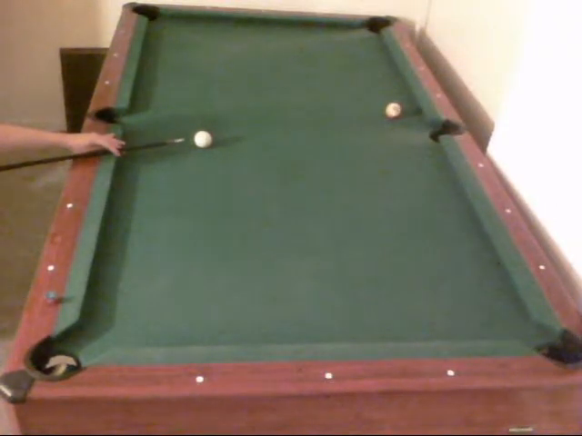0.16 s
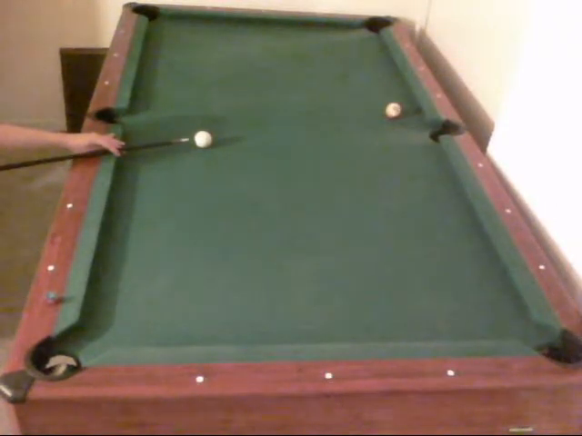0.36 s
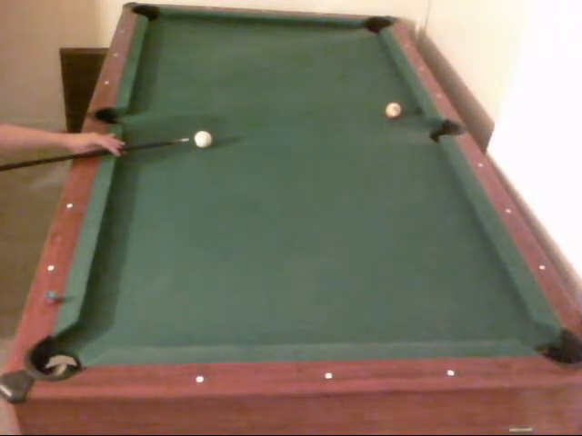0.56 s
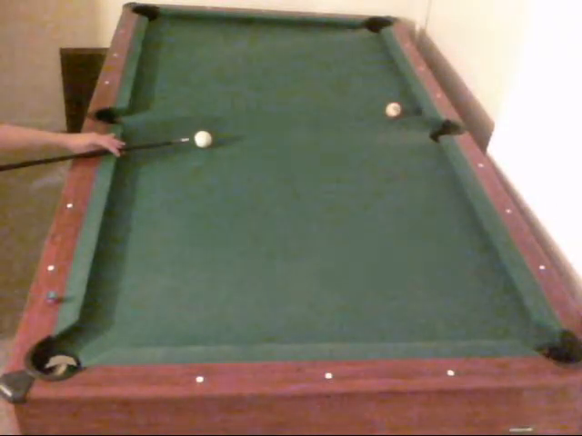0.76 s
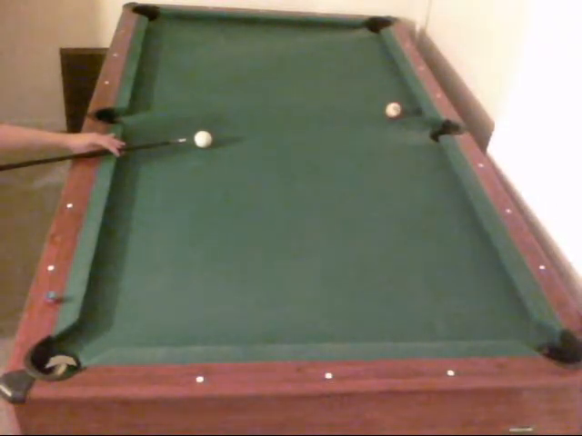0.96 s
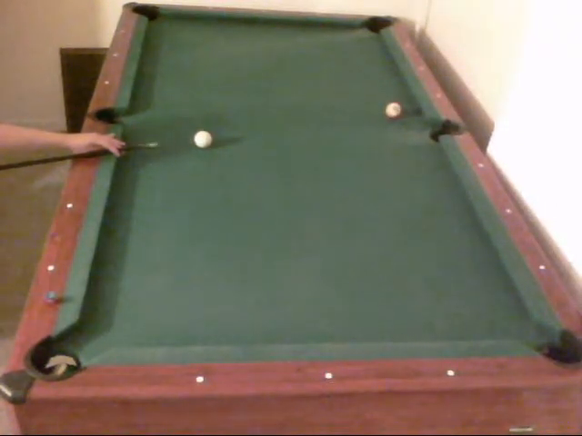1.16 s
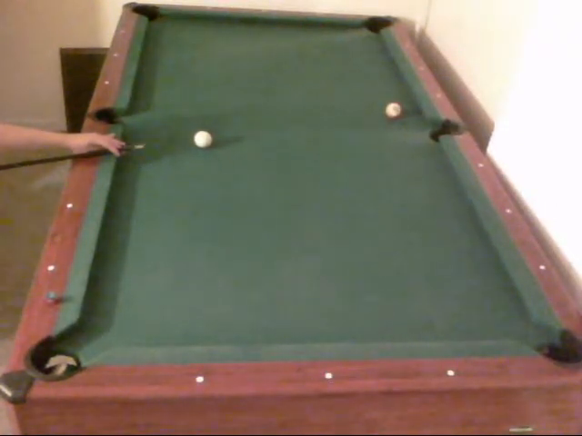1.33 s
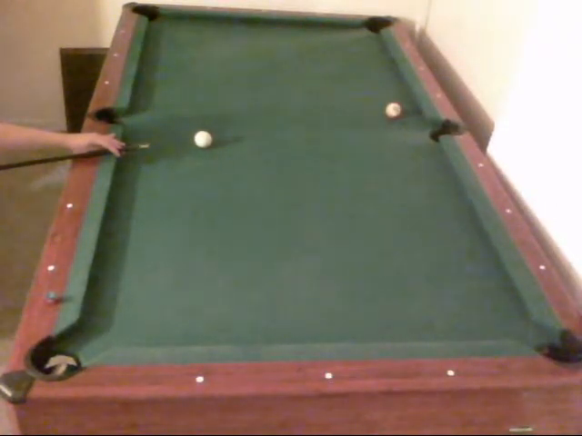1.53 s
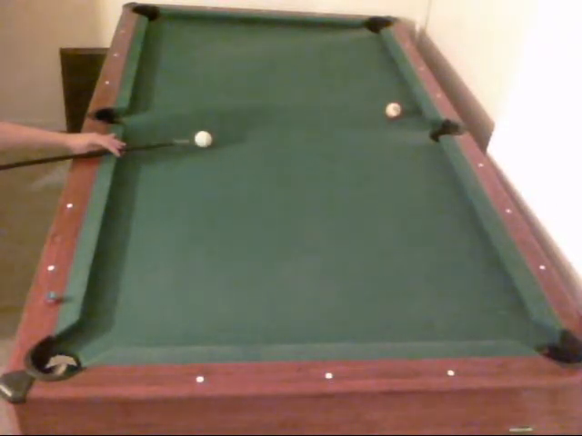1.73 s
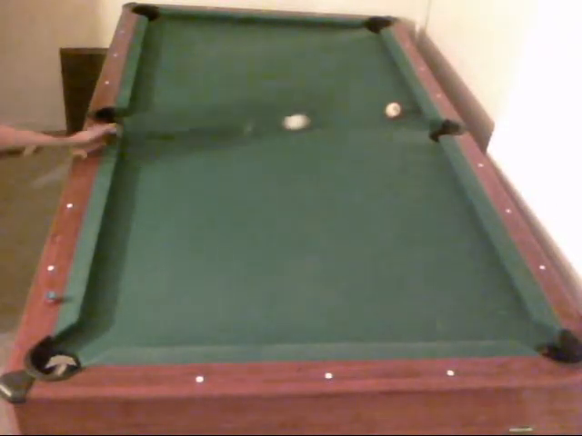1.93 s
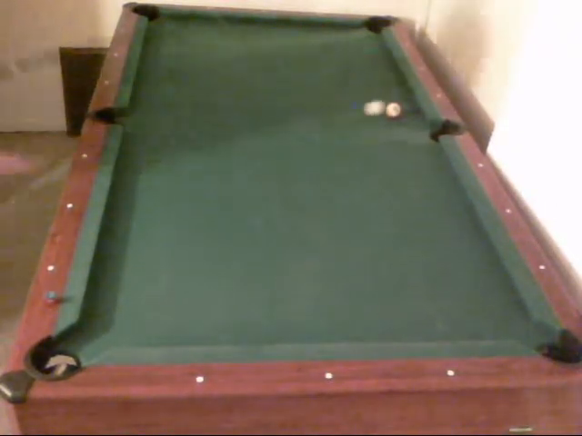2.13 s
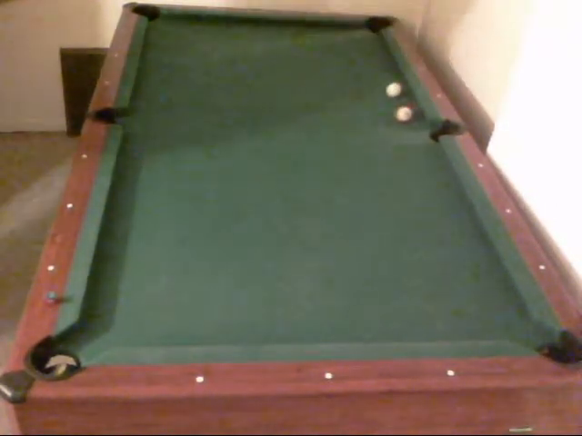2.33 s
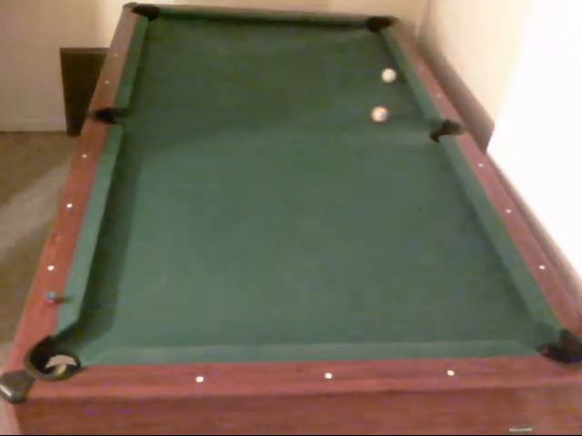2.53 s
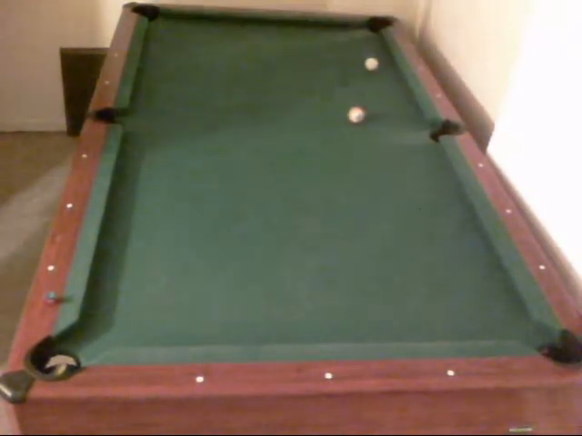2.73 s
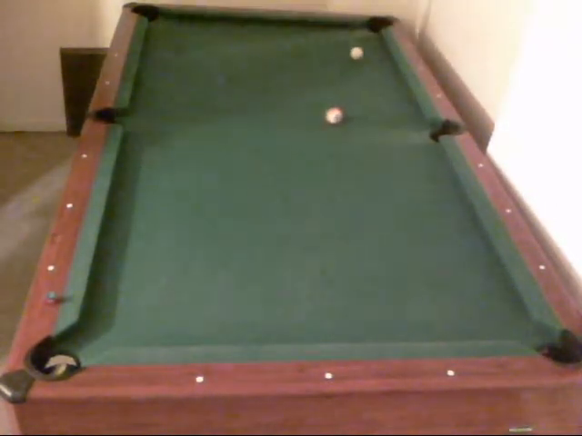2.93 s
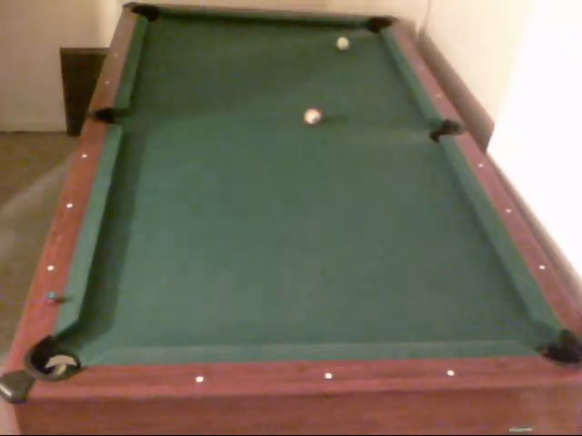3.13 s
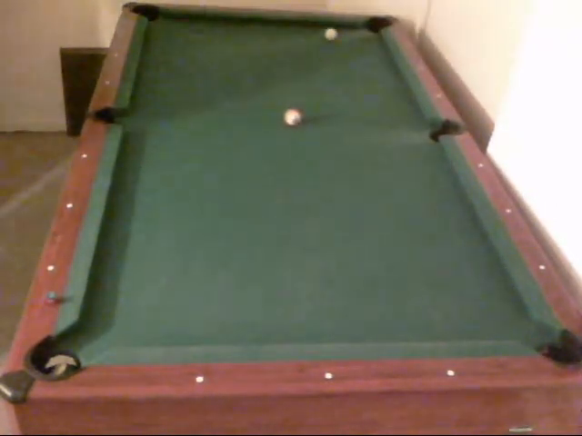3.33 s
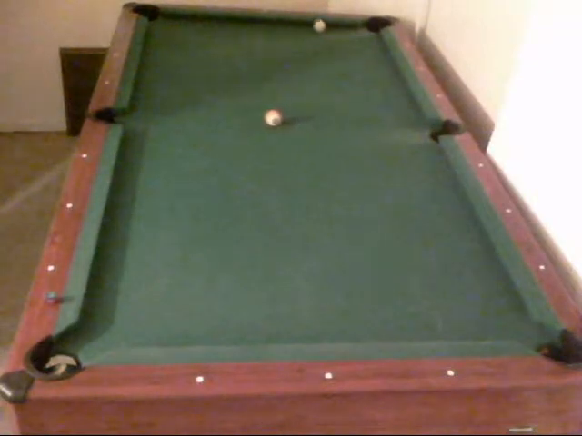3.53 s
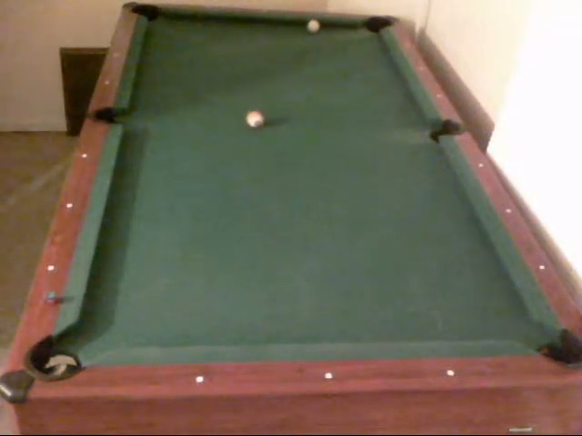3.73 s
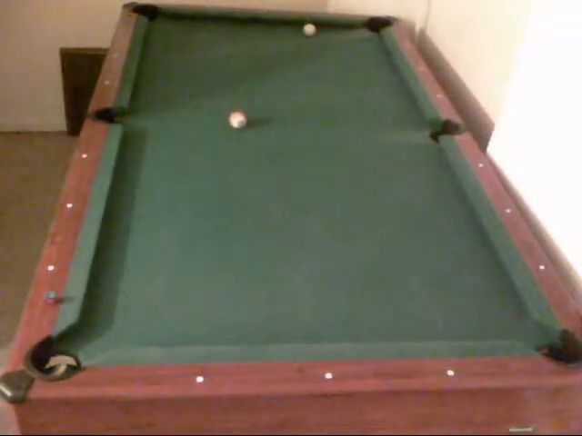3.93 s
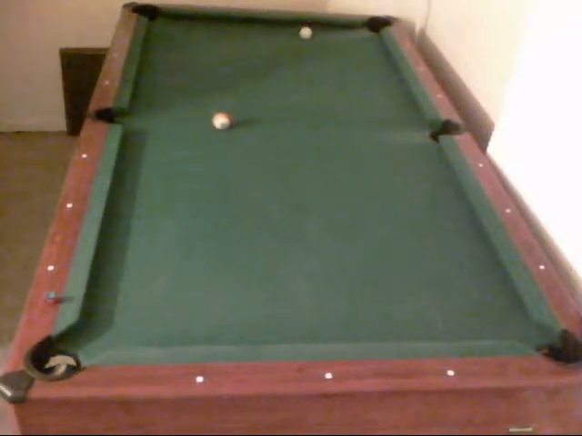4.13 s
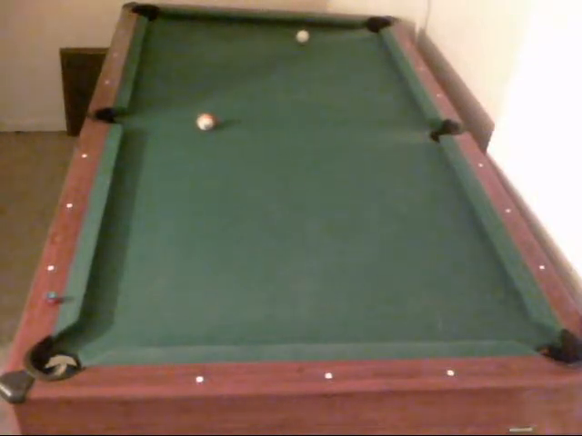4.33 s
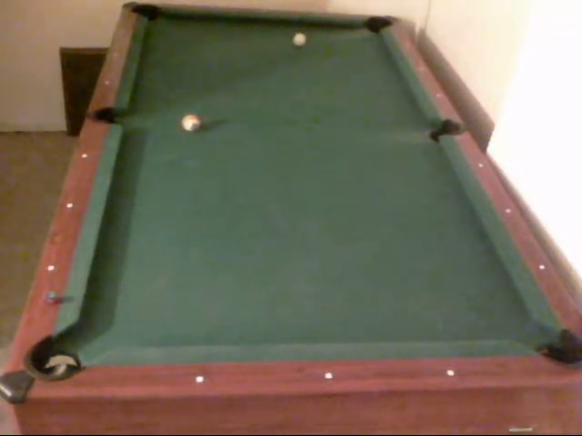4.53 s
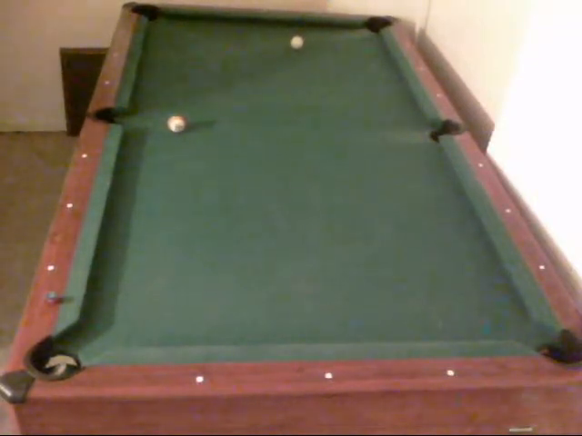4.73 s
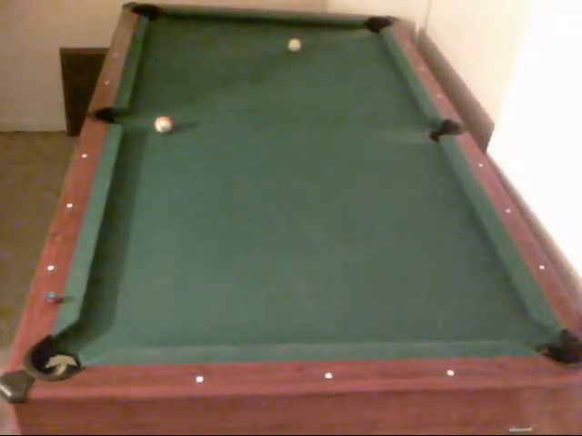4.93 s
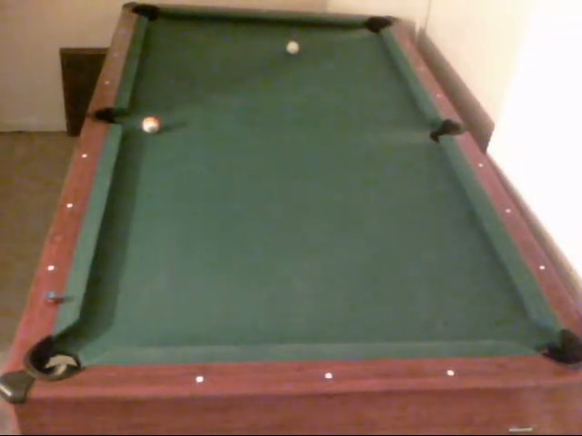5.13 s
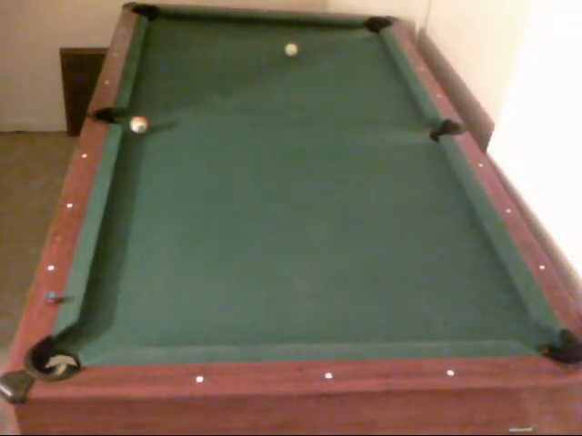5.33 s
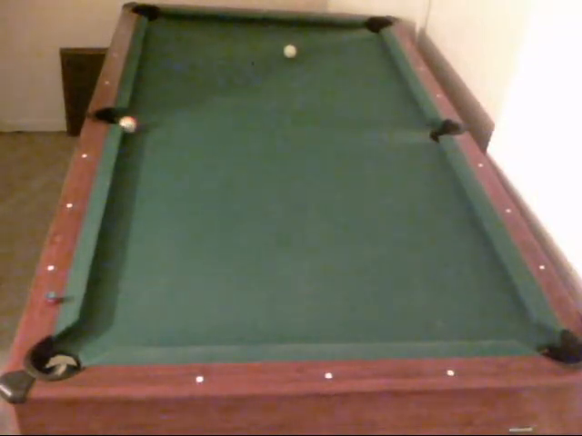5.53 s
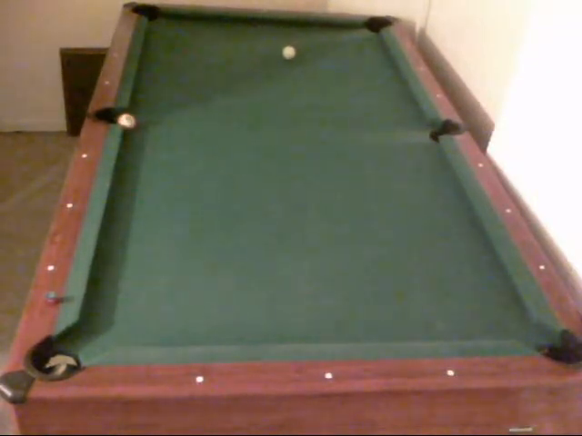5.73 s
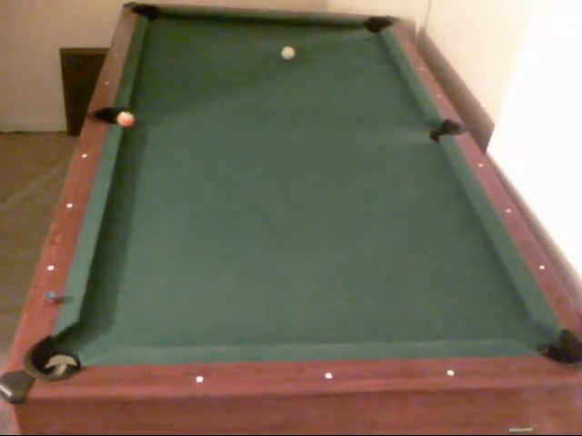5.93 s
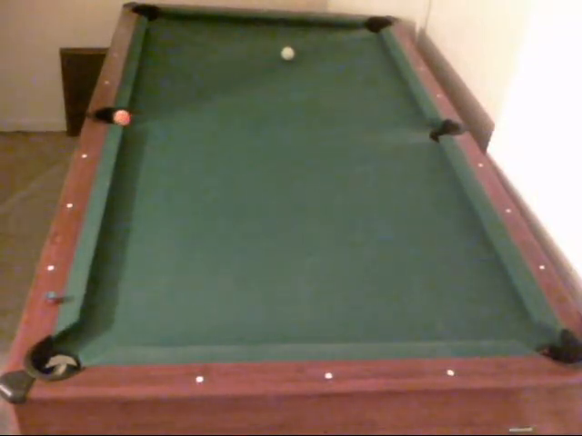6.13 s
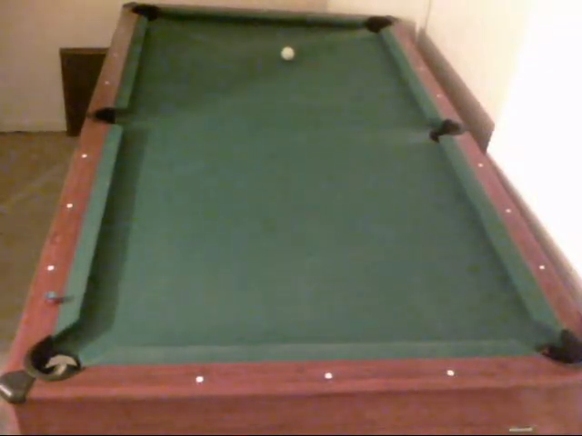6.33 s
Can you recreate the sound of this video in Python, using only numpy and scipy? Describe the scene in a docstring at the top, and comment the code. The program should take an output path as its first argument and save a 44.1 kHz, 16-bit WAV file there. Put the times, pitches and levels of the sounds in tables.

```python
"""Impacts on a pool table

In a small bare room the cue drives the white into a ball; both knock cushions and roll on, and one
drops onto balls in a pocket. Each blow radiates through the air, followed by wall echoes and a short
tail, and excites the low modes of the table bed, which rolling also shakes. Cue and sleeve slide softly.
A machine hums behind the hiss of a cheap microphone at the near rail."""
import sys
import numpy as np
from scipy import signal
from scipy.fft import rfft, irfft
from scipy.io import wavfile
from scipy.ndimage import uniform_filter1d

SR = 44100
rng = np.random.default_rng(int(sys.argv[2]) if len(sys.argv) > 2 else 0)


def pcm_store(signal):
    """Save signal as 16-bit PCM."""
    levels = np.round(np.clip(np.atleast_2d(signal), -1, 1) * 32767)
    wavfile.write(sys.argv[1], SR, levels.astype(np.int16).T)


N = 284886
T = np.arange(N) / SR
BLOW_SAMPLES = 22050

# impacts: t/s, air level/dB, bed level/dB
CUE_HITS = [(1.9085, -11, -15.5)]
BALL_HITS = [(2.296, -5.5, -19)]
CUSHION_HITS = [(2.379, -22.5, -23.5), (2.424, -31.5, -22.5), (2.480, -49, -34.5), (2.595, -42, -36.5),
                (3.757, -41.5, -34), (3.845, -62, -54)]
POCKET_HITS = [(6.411, -17.5, -37), (6.417, -20.5, -35), (6.438, -15, -35), (6.4415, -19.5, -30)]
TICK_HITS = [(2.953, -48, -57)]
# spectra of the impacts, the sliding and the noise floor: f/Hz, relative density/dB
CUE_SPECTRUM = [(88, -32), (150, 2), (283, -4.5), (474, -9), (906, -10.5), (975, -10), (1050, -10.5),
                (1710, -13.5), (1950, -23), (2160, -13), (2940, -17), (5080, -20.5), (6600, -55.5),
                (11200, -120)]
BALL_SPECTRUM = [(150, -47.5), (250, -24.5), (660, -23.5), (1460, -2.5), (1590, -4.5), (1720, 0),
                 (1950, -4), (2100, -1.5), (2640, -2.5), (3350, -4), (4370, -15.5), (5080, -26.5),
                 (6600, -67), (11200, -120)]
CUSHION_SPECTRUM = [(120, -1), (200, -10), (300, -4.5), (450, -4), (700, -6), (1000, -23), (2000, -30),
                    (5000, -46)]
POCKET_SPECTRUM = [(150, -53), (250, -23), (748, -11), (849, -11), (904, -11.5), (1520, -9), (1630, -8),
                   (2080, -5), (3950, -14), (5080, -31), (6600, -68), (11200, -120)]
TICK_SPECTRUM = [(300, -16), (1000, -1), (2500, -1), (4000, -1.5), (5000, -7)]
SLIDE_SPECTRUM = [(1500, -24), (2500, -10), (3200, -4), (4000, -2), (5500, 0)]
FLOOR_SPECTRUM = [(12, -2.5), (18, -3), (30, -8), (60, -9), (90, -14.5), (170, -17), (200, -24.5),
                  (400, -25.5), (700, -32.5), (2000, -36.5), (5500, -42)]
# modes of the cue shaft and the table bed: f/Hz, level/dB, T60/s
SHAFT_MODES = [(436, -15.5, 0.17), (960, -8, 0.047), (1292, -8, 0.19), (2200, -20, .12), (2520, -8, 0.18)]
BED_MODES = [(61, 4.5, 0.16), (75.2, 6.5, 0.28), (99.5, 0, 0.77), (133, -5.5, 0.26), (162.3, -6, 0.35),
             (189.9, -9, 0.53), (292, -17, 0.062)]
# thumps passed by rubber to the wooden rail, and hard contact clicks: t/s, f/Hz, level/dB, rise/cycles
RAIL_THUMPS = [(2.380, 119.6, -8.5, 0.84), (2.417, 88.3, -15.5, 0.93), (2.478, 79, -23, 1),
               (3.772, 78, -13.5, 1), (3.845, 68, -20.5, 1), (6.426, 112.1, -16, 0.84), (6.444, 62, -14, 1)]
CONTACT_CLICKS = [(1.9076, 3500, -17, .8), (2.378, 4750, -16, 2.1), (6.4172, 2100, -4.5, 0.77),
                  (6.4442, 2300, -15, 0.89), (6.4476, 2300, -2, 0.64), (6.4555, 2800, -16, 0.73)]
# bed vibration under rolling balls: t/s, level/dB
ROLL_LEVEL = [(1.95, -19), (2.01, -25), (2.11, -16), (2.24, -28), (2.28, -23), (2.36, -31), (2.53, -37),
              (2.61, -20.5), (2.72, -38.5), (3.01, -25), (3.2, -32), (3.44, -25.5), (3.49, -43),
              (3.54, -33), (3.62, -25.5), (3.67, -36.5), (3.95, -41.5), (4.22, -35), (4.4, -48.5)]
# its pitch as the balls cross the bed: t/s, f/Hz
ROLL_PITCH = [(2.0, 63.53), (2.7, 65.33), (2.82, 80), (2.98, 78.8), (3.07, 69.1), (3.6, 70.5),
              (4.25, 62.34)]
# slides of cue and sleeve: t/s at full level, hold/s, level/dB
SLIDES = [(0.33, .02, -47.5), (1.22, .02, -46), (2.74, .02, -53.5), (3.33, .17, -41)]
# direct sound and early reflections: delay/ms, level/dB
ARRIVALS = [(0, 2.5), (2, 0), (6.5, 1), (11.5, -3), (15.5, -3.5), (18, -4.5), (22.5, -7.5), (28, -13),
            (37, -6.5)]
# reverberation time: f/Hz, T60/s
ROOM_DECAY = [(150, 0.69), (500, 0.47), (1000, 0.46), (2000, 0.43), (4000, 0.38), (5500, 0.72)]
# rough machine resonances: f/Hz, bandwidth/Hz, level/dB
MACHINE_BANDS = [(42.7, 16, -41.5), (224.7, 7.7, -65.5), (278.7, 14, -61.5)]
# steady motor tones: f/Hz, level/dB
MOTOR_TONES = [(120, -46), (162, -50.5)]


def ball_impacts():
    """Elastic collision: ball meets ball, pocketed balls or cushion; softer contact starts more gently."""
    collision = impacts(BALL_HITS, BALL_SPECTRUM)
    pocket = impacts(POCKET_HITS, POCKET_SPECTRUM, contact_ms=.37)
    cushions = impacts(CUSHION_HITS, CUSHION_SPECTRUM, contact_ms=2.7)
    faint_tick = impacts(TICK_HITS, TICK_SPECTRUM)
    return collision + pocket + cushions + faint_tick


def cue_strike():
    """Impulse excitation: the tip strikes the white and sets the shaft ringing."""
    shaft = modal_ring(SHAFT_MODES, rise_s=.0046)
    return impacts(CUE_HITS, CUE_SPECTRUM, own_ring=shaft, contact_ms=2.1)


def impacts(hits, spectrum, own_ring=0, contact_ms=.1):
    """Two transmission paths: each blow sounds through the air and through the bed."""
    out = np.zeros(N)
    onset = 1 - np.exp(-np.arange(BLOW_SAMPLES) / SR * 1000 / contact_ms)
    for start_s, air_db, bed_db in hits:
        i = int(start_s * SR)
        air = undb(air_db) * onset * (room_response(spectrum) + own_ring)
        bed = undb(bed_db) * modal_ring(BED_MODES, rise_s=.011)
        out[i:i + BLOW_SAMPLES] += (air + bed)[:N - i]
    return out


def modal_ring(modes, rise_s):
    """Modal superposition: damped sinusoids, a little different for each spot struck."""
    t = np.arange(BLOW_SAMPLES) / SR
    hz, db, t60 = np.array(modes).T[:, :, None]
    spot = rng.standard_normal((2, len(modes), 1))
    partials = undb(db + 1.1 * spot[0]) * np.sin(2 * np.pi * hz * (1 + .0081 * spot[1]) * t)
    decay = np.exp(-np.log(1000) * t / t60)
    return (partials * decay).sum(axis=0) * (1 - np.exp(-t / rise_s))


def contact_pulses(pulses):
    """Heavy damping: a thump or click swells and dies within a few cycles."""
    start_s, hz, db, rise = np.array(pulses).T[:, :, None]
    cycles = np.clip((T - start_s) * hz, 0, 60)
    envelope = undb(db) * cycles / rise * np.exp(1 - cycles / rise)
    return (envelope * np.sin(2 * np.pi * cycles)).sum(axis=0)


def rolling():
    """Forced vibration: the bed hums at a wavering pitch; cloth grit stirs its upper modes."""
    pitch = np.interp(T, *np.transpose(ROLL_PITCH)) * (1 + .03 * drift(25))
    hum = np.sqrt(2) * np.sin(2 * np.pi * np.cumsum(pitch) / SR) * undb(2.5 * drift(14))
    grit = noise([(40, -4), (70, -1.5), (110, 2), (170, -7.5), (300, -27), (600, -41), (5000, -73.5)], N)
    envelope = undb(np.interp(T, *np.transpose(ROLL_LEVEL), left=-120, right=-120))
    return envelope * (hum + undb(-11) * grit)


def sliding():
    """Friction noise: each soft treble slide of cue and sleeve swells, holds and fades."""
    rise_db_per_s, fall_db_per_s = 99.5, 161.5
    full_s, hold_s, db = np.array(SLIDES).T[:, :, None]
    before, after = np.maximum(full_s - T, 0), np.maximum(T - full_s - hold_s, 0)
    envelope = undb(db - rise_db_per_s * before - fall_db_per_s * after).sum(axis=0)
    return envelope * noise(SLIDE_SPECTRUM, N)


def room_response(spectrum):
    """Reverberation: a blow and its wall reflections merge into a tail that decays octave by octave."""
    ring_ms, build_ms, tail_db = 2.52, 11.4, -2
    t = np.arange(BLOW_SAMPLES) / SR
    delay_ms, db = np.array(ARRIVALS).T[:, :, None]
    age_ms = 1000 * t - delay_ms
    bursts = np.where(age_ms >= 0, np.exp(-np.abs(age_ms) / ring_ms), 0)
    sound = noise(spectrum, BLOW_SAMPLES)
    # an evened envelope spares single arrivals the chance dips of the tail
    firm = level(sound / (np.abs(signal.hilbert(sound)) + 1.1))
    early = firm * (undb(db) * bursts).sum(axis=0)
    hz = frequencies(BLOW_SAMPLES)
    centres = 2. ** np.arange(6, 14)[:, None]
    share = np.maximum(1 - np.abs(np.log2(np.maximum(hz, 1) / centres)), 0)
    octaves = irfft(rfft(sound) * share, BLOW_SAMPLES)
    decay = np.exp(-np.log(1000) * t / along(ROOM_DECAY, centres))
    build = undb(tail_db) * (1 - np.exp(-t * 1000 / build_ms))
    return early + (octaves * decay).sum(axis=0) * build


def machine_hum():
    """Resonance: a distant machine gives narrow noise bands beside slightly wavering motor tones."""
    hum = np.zeros(N)
    for hz, width, db in MACHINE_BANDS:
        resonance = 1 / (1 + ((frequencies(N) - hz) / (width / 2)) ** 2)
        hum += level(irfft(rfft(rng.standard_normal(N)) * resonance, N), db)
    for hz, db in MOTOR_TONES:
        tone = np.sin(2 * np.pi * (hz * T + .068 * drift(3)))
        hum += level(tone, db) * undb(.8 * drift(4))
    return hum


def noise_floor():
    """Stationary noise: low rumble and microphone hiss."""
    return undb(-40) * noise(FLOOR_SPECTRUM, N)


def noise(spectrum, size):
    """Spectral shaping: noise of unit rms, falling away below the lowest listed frequency."""
    hz = frequencies(size)
    gain = undb(along(spectrum, hz)) * np.minimum(hz / spectrum[0][0], 1) ** 2
    return level(irfft(rfft(rng.standard_normal(size)) * gain, size))


def drift(rate_hz):
    """Moving averages: slow random fluctuation of unit rms."""
    span = int(SR / rate_hz)
    return level(uniform_filter1d(uniform_filter1d(rng.standard_normal(N), span), span))


def along(points, hz):
    """Interpolation on a log-frequency axis."""
    f, values = np.array(points, float).T
    return np.interp(np.log(np.maximum(hz, 1)), np.log(f), values)


def frequencies(size):
    """Fourier bin frequencies, f/Hz."""
    return np.arange(size // 2 + 1) * SR / size


def level(x, db=0):
    """Normalisation to an rms level."""
    return x * undb(db) / np.sqrt(np.mean(x ** 2))


def undb(db):
    """Amplitude ratio of a level in dB."""
    return 10 ** (np.asarray(db) / 20)


def scene():
    """Linear superposition: all sources add in one channel."""
    hits = cue_strike() + ball_impacts() + contact_pulses(RAIL_THUMPS + CONTACT_CLICKS)
    return (hits + rolling() + sliding() + machine_hum() + noise_floor())[None]


def record(dry):
    """Saturation: after a low-pass and a steady offset, the loudest peaks flatten and spread treble."""
    band_hz, top_hz, offset, knee = 5400, 16000, -.0247, 24
    narrow = offset + signal.sosfilt(signal.ellip(12, .2, 90, band_hz, fs=SR, output="sos"), dry)
    flattened = narrow / (1 + np.abs(narrow) ** knee) ** (1 / knee)
    return signal.sosfilt(signal.ellip(10, .1, 90, top_hz, fs=SR, output="sos"), flattened)


dry = scene()
out = record(dry)
pcm_store(out)
```